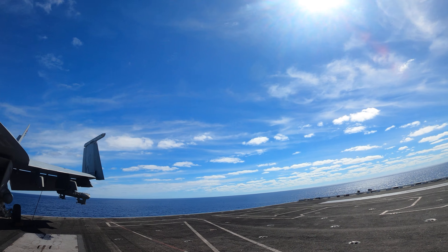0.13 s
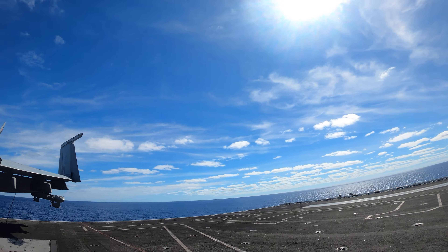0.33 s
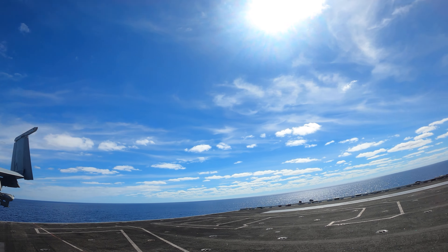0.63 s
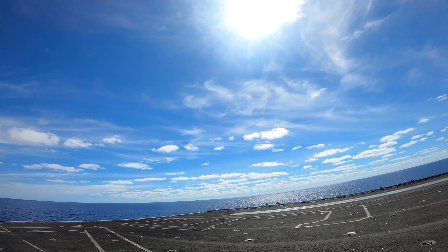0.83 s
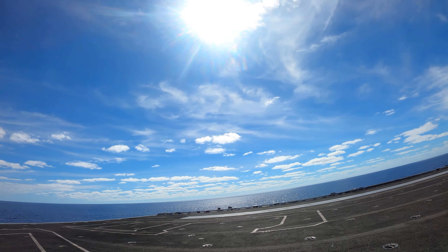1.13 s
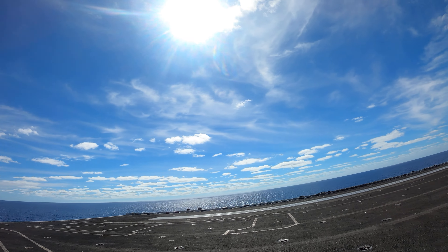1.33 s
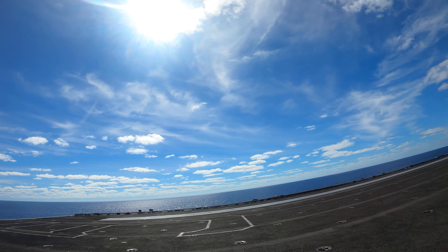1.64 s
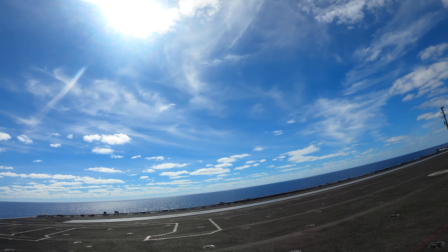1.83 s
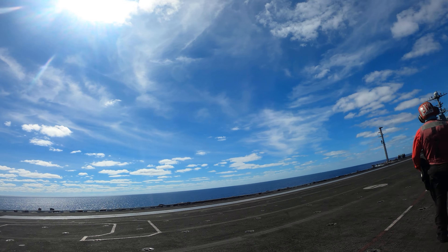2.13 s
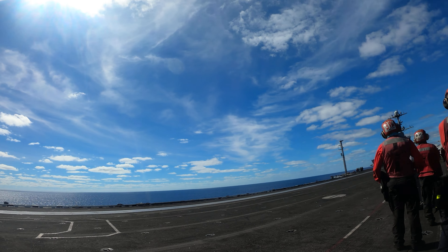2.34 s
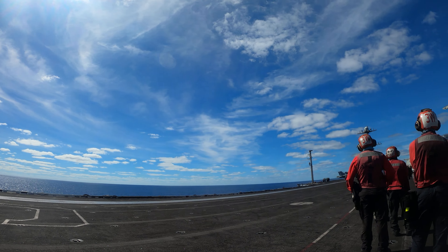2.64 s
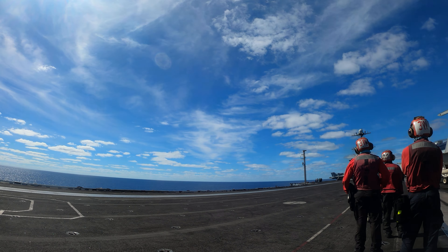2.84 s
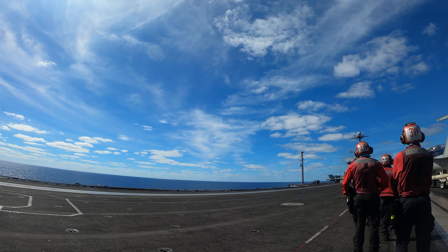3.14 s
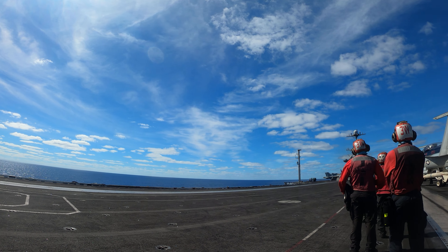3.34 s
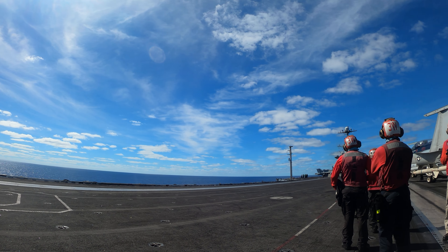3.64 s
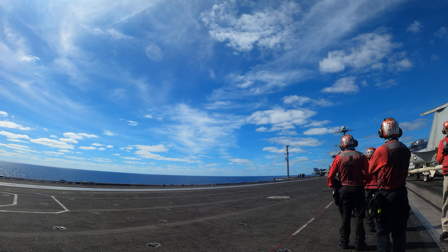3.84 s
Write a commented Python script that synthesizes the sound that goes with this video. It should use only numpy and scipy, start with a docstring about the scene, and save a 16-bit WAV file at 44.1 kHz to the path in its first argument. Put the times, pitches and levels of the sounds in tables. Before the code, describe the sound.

Jet engines roar and whine steadily on a ship deck, growing duller and deeper as the microphone turns

```python
"""Jet engines idling on a ship deck

Wind and deck rumble (low coloured noise) lies under a broad exhaust roar (noise in gliding bands) and a rough
fan whine (narrow noise on multiples of one blade rate, plus a wavering sine on the second). The sound fades in,
then the microphone turns away from the intakes: whine and hiss dull and the low roar swells. Meanwhile, after
about 1.2 s, a thin wide hiss (noise of opposite sign left and right) rises at the very top."""
import sys
import numpy as np
from scipy import signal
from scipy.fft import rfft, irfft
from scipy.io import wavfile
from scipy.ndimage import uniform_filter1d

SR = 44100
rng = np.random.default_rng(int(sys.argv[2]) if len(sys.argv) > 2 else 0)


def store_wav(level_fs):
    """Save 16-bit WAV to argv[1]."""
    pcm = np.round(np.clip(np.atleast_2d(level_fs), -1, 1) * 32767)
    wavfile.write(sys.argv[1], SR, pcm.T.astype(np.int16))


N = 176400
TIME_S = np.arange(N) / SR
BINS_HZ = np.arange(N // 2 + 1) * SR / N + 1e-3   # offset keeps log(0) away


def from_db(db):
    """Decibels to gain."""
    return 10 ** (np.asarray(db) / 20)


def rms_one(x):
    """Scales to rms 1."""
    return x / np.sqrt(np.mean(x ** 2) + 1e-20)


def in_time(rows):
    """Columns of a time table, linearly interpolated to one value per sample."""
    times_s, *columns = np.transpose(rows)
    return [np.interp(TIME_S, times_s, column) for column in columns]


def colour_db(points):
    """Colour table at the spectrum bins, linear in dB over log frequency."""
    points_hz, points_db = np.transpose(points)
    return np.interp(np.log(BINS_HZ), np.log(points_hz), points_db)


def white():
    """Spectrum of white noise."""
    return rfft(rng.standard_normal(N))


def coloured(points):
    """Noise of a given colour, rms 1."""
    return rms_one(irfft(white() * from_db(colour_db(points)), N))


def drift(corner_hz):
    """Slow random wander, rms 1: noise through two equal poles, run at SR / 40."""
    step = 40
    settle = 2000   # filter start-up, dropped
    pole = np.exp(-2 * np.pi * corner_hz * step / SR)
    noise = rng.standard_normal(N // step + settle + 2)
    slow = signal.lfilter([1], [1, -2 * pole, pole * pole], noise)[settle:]
    return np.interp(np.arange(N) / step, np.arange(len(slow)), rms_one(slow))


def whistle(hz, half_width_hz):
    """Noise twice through a narrow resonance, rms 1; gain is half at half_width_hz off centre."""
    resonance = 1 / (1 + ((BINS_HZ - hz) / half_width_hz) ** 2)
    return rms_one(irfft(white() * resonance, N))


# wind and deck rumble level: (time [s], level [dB])
RUMBLE_LEVEL = [(.3, -20), (.6, -15.5), (.9, -17.5), (1.2, -14.5), (1.5, -13.5), (2.0, -16), (2.5, -13.5),
                (2.9, -18), (3.3, -14.5), (3.7, -15.5), (4.0, -17.5)]
# rumble colour: (frequency [Hz], relative density [dB])
RUMBLE_SPECTRUM = [(10, -35), (18, -13), (28, -1.5), (36, 3.5), (54, 5.5), (62, 3.5), (70, 7), (80, -2),
                   (100, -11), (130, -49.5), (200, -130)]
RUMBLE_EVENNESS = .3   # 0 = plain noise, 1 = nearly no lumps


def rumble():
    """Wind and deck rumble: low noise divided by a power of its own envelope, so lumps even out."""
    noise = coloured(RUMBLE_SPECTRUM)
    envelope = uniform_filter1d(np.abs(signal.hilbert(noise)), size=1200)   # samples
    evened = rms_one(noise / (envelope + 0.056) ** RUMBLE_EVENNESS)
    level_db, = in_time(RUMBLE_LEVEL)
    return from_db(level_db) * evened


# left-right difference: (time [s], top hiss level [dB], broad spread level [dB])
SIDE_LEVELS = [(.3, -85, -52), (1.1, -86, -66), (1.4, -66, -55), (1.7, -58, -55), (2.2, -55, -68),
               (2.6, -53, -62.5), (3.2, -53, -55.5), (4.0, -52, -80)]
# top hiss colour: (frequency [Hz], relative density [dB])
TOP_HISS_SPECTRUM = [(9000, -60), (10800, -14), (11300, -3), (12000, -1), (13000, -9), (14600, -9),
                     (15000, -13), (15700, -18)]
# broad spread colour: (frequency [Hz], relative density [dB])
SPREAD_SPECTRUM = [(30, 6), (300, 8), (1000, 5), (2500, 4), (4500, 1), (6000, 1), (8500, -3), (10000, -9),
                   (11000, -16), (12000, -60)]


def wide_hiss():
    """Noise that differs left to right: a thin top hiss and a faint broad spread."""
    top_db, spread_db = in_time(SIDE_LEVELS)
    top = from_db(top_db) * coloured(TOP_HISS_SPECTRUM)
    return top + from_db(spread_db) * coloured(SPREAD_SPECTRUM)


# faint side tones: (frequency [Hz], level facing [dB], half width [Hz], gain when turned away [dB])
SIDE_TONES = [(549, -38, 3, 5), (822, -38, 8, 1), (1968, -39, 6, -4), (1985, -41, 25, 0),
              (4287, -49, 6, -4)]


def side_tones(turn):
    """Faint tones off the blade multiples: narrow resonant noise whose level follows the turn."""
    out = 0
    for hz, level_db, half_width_hz, away_gain_db in SIDE_TONES:
        out = out + from_db(level_db + away_gain_db * turn) * whistle(hz, half_width_hz)
    return out


BLADE_HZ = 999.6
# clean tone on the second multiple: (time [s], level [dB])
SECOND_LEVEL = [(0.32, -46), (0.43, -57), (0.49, -30), (0.53, -48), (0.89, -31), (1.06, -41), (1.41, -40),
                (1.5, -58), (1.63, -24.5), (1.65, -48), (2.53, -51.5), (2.76, -31), (3.53, -42),
                (3.62, -27), (3.73, -40), (4.0, -37)]


def second_multiple():
    """Sine at twice the blade rate that comes and goes, its phase wandering."""
    phase_rad = 2 * np.pi * 2 * BLADE_HZ * TIME_S + 1.05 * drift(8.3)
    level_db, = in_time(SECOND_LEVEL)
    return from_db(level_db) * np.sqrt(2) * np.sin(phase_rad)   # sqrt(2): rms level


# fan whine: (multiple of blade rate, line level facing [dB], skirt level facing [dB],
# loss when turned away [dB])
WHINE_MULTIPLES = [(3, -57, -41.5, 8), (4, -42, -40, 6), (5, -36, -28.5, 8), (6, -52, -34.5, 12),
                   (7, -58, -42, 7.5), (8, -69, -39, 16), (9, -56, -46.5, 19), (10, -70, -50, 19)]
LINE_HALF_WIDTH_HZ = 7
SKIRT_SAG, SKIRT_HALF_WIDTH = .003, 0.016   # downward shift and half width, shares of the pitch


def fan_whine(turn):
    """Each multiple of the blade rate: a thin line inside a skirt scattered by turbulent air."""
    out = second_multiple()
    for multiple, line_db, skirt_db, away_loss_db in WHINE_MULTIPLES:
        hz = multiple * BLADE_HZ
        line = from_db(line_db) * whistle(hz, LINE_HALF_WIDTH_HZ)
        skirt = from_db(skirt_db) * whistle(hz * (1 - SKIRT_SAG), hz * SKIRT_HALF_WIDTH)
        out = out + (line + skirt) * from_db(-away_loss_db * turn)
    return out


# roar colour facing the intakes: (frequency [Hz], relative density [dB])
FACING_SPECTRUM = [(60, -36), (95, -8), (130, -0.5), (190, -8), (250, -7.5), (320, -14), (600, -12.5),
                   (860, -10.5), (1360, -17.5), (1680, -16.5), (2130, -20), (3900, -20.5), (4530, -26),
                   (5380, -24), (6500, -29.5), (7500, -31.5), (8500, -32.5), (10500, -45), (11500, -49.5),
                   (13500, -58), (14500, -63), (15500, -76)]
# roar colour turned away: (frequency [Hz], relative density [dB])
AWAY_SPECTRUM = [(60, -11), (95, -3.5), (150, -0.5), (240, -4.5), (290, -3.5), (370, -9), (480, -12.5),
                 (610, -12.5), (830, -8.5), (1000, -13), (1450, -21), (1800, -18.5), (2200, -24.5),
                 (3500, -33), (4500, -33), (5500, -36.5), (6500, -40), (7500, -43), (9400, -44),
                 (10300, -42.5), (11150, -41), (11700, -49), (13050, -49), (14000, -57), (15600, -61)]
FACING_DB, AWAY_DB = -18, -14   # before unevenness and level tables
# gain of the upper middle of the roar: (time [s], level [dB])
UPPER_LEVEL = [(.3, -1), (.8, -0.2), (1.3, 1.4), (1.8, 1.5), (2.2, -1.5), (2.6, -0.7), (3.1, 2.5),
               (3.6, 1.7), (4.0, 5)]
UPPER_HZ, UPPER_OCTAVES = 2720, 0.75   # centre, reach to 1/e of the dB gain
SHARED_DB, BAND_SLOW_DB, BAND_FAST_DB = .24, .8, .48   # rms unevenness of the bands


def at_level(points, level_db):
    """Colour in dB, shifted so that white noise of rms 1 comes out at level_db."""
    db = colour_db(points)
    return db + level_db - 10 * np.log10(np.mean(from_db(db) ** 2))


def exhaust_roar(turn):
    """Exhaust turbulence in overlapping third-octave bands, each gliding between two colours."""
    gains = from_db([at_level(FACING_SPECTRUM, FACING_DB), at_level(AWAY_SPECTRUM, AWAY_DB)])
    noise, shared, out = white(), drift(2.35), 0
    upper_db, = in_time(UPPER_LEVEL)
    for third in np.arange(18, 43):   # centre = 2 ** (third / 3) Hz
        mask = np.cos(np.pi / 2 * np.clip(3 * np.log2(BINS_HZ) - third, -1, 1)) ** 2
        facing, away = irfft(noise * mask * gains, N)
        uneven_db = SHARED_DB * shared + BAND_SLOW_DB * drift(1.6) + BAND_FAST_DB * drift(16)
        octaves_off = third / 3 - np.log2(UPPER_HZ)
        upper_share = np.exp(-(octaves_off / UPPER_OCTAVES) ** 2)
        band = facing + turn * (away - facing)
        out = out + from_db(uneven_db + upper_share * upper_db) * band
    return out


# microphone turn: (time [s], turn [0 = facing the intakes, 1 = away], engine level [dB])
MIC_TURN = [(.3, 0.01, 0.11), (.7, 0.018, 0.077), (1.0, 0.15, .1), (1.3, 0.31, .1), (1.6, 0.36, 0.12),
            (1.9, 0.73, 0.12), (2.2, 0.73, 0.057), (2.5, 0.85, 0.06), (2.9, 0.97, 0.14), (3.3, 1, 0.25),
            (3.7, 1, 0.14), (4.0, 0.98, 0.12)]


def scene():
    """Engines and rumble in the middle; the wide hiss with opposite sign left and right."""
    turn, engine_db = in_time(MIC_TURN)
    engines = exhaust_roar(turn) + fan_whine(turn) + side_tones(turn)
    middle = rumble() + from_db(engine_db) * engines
    side = wide_hiss()
    return np.array([middle + side, middle - side])


FADE_START_S, FADE_LENGTH_S, FADE_CURVE = 0.23, 0.076, 1.68
CEILING, CUTOFF_HZ = 1.3, 15720


def record(dry):
    """Rounds peaks, fades in from silence, cuts the top with a steep low-pass."""
    rounded = CEILING * np.tanh(dry / CEILING)
    fade = np.clip((TIME_S - FADE_START_S) / FADE_LENGTH_S, 0, 1) ** FADE_CURVE
    low_pass = signal.ellip(14, .5, 70, CUTOFF_HZ, fs=SR, output="sos")   # ripple, stop [dB]
    return signal.sosfilt(low_pass, fade * rounded)


dry = scene()
out = record(dry)
store_wav(out)
```